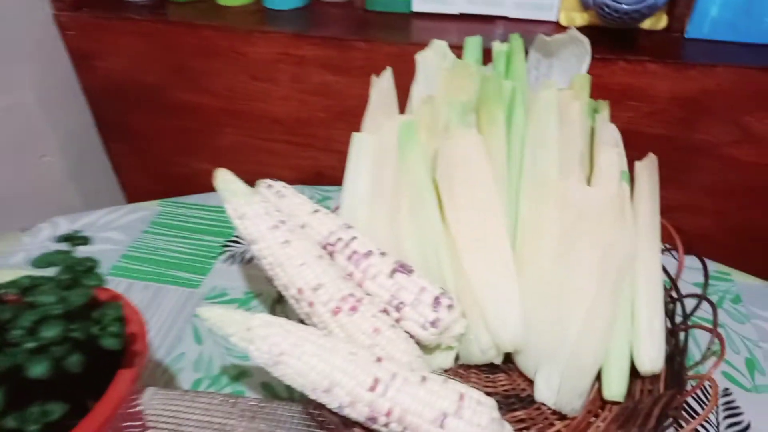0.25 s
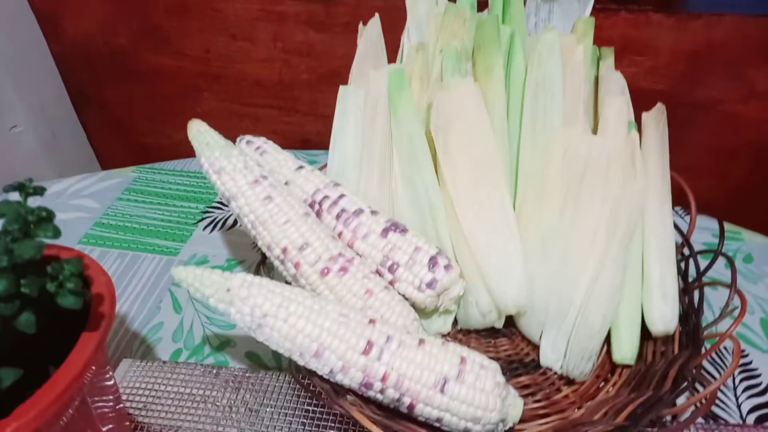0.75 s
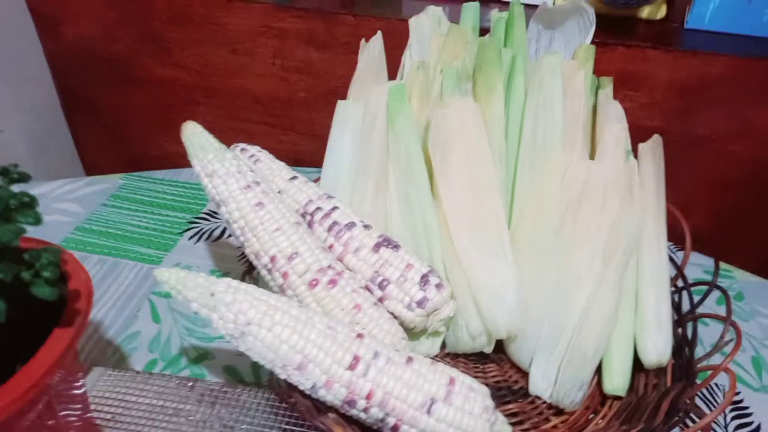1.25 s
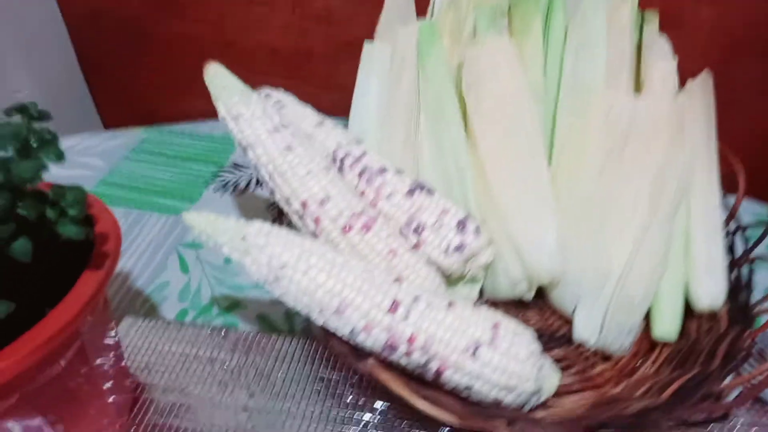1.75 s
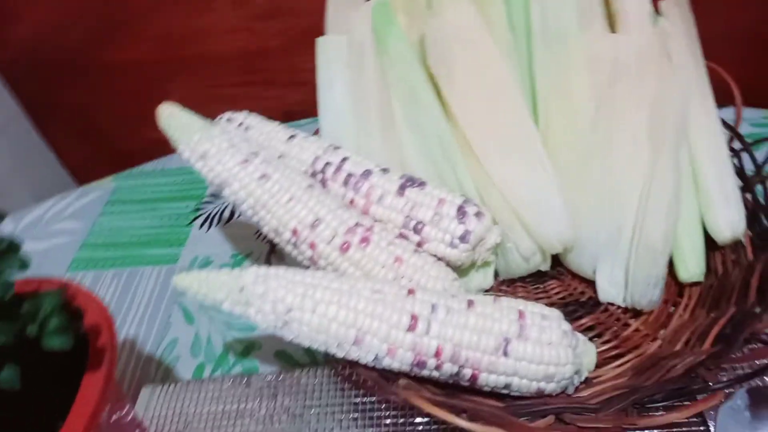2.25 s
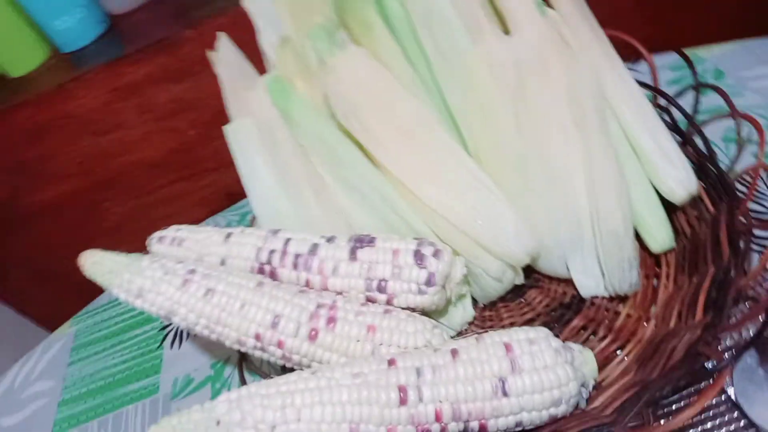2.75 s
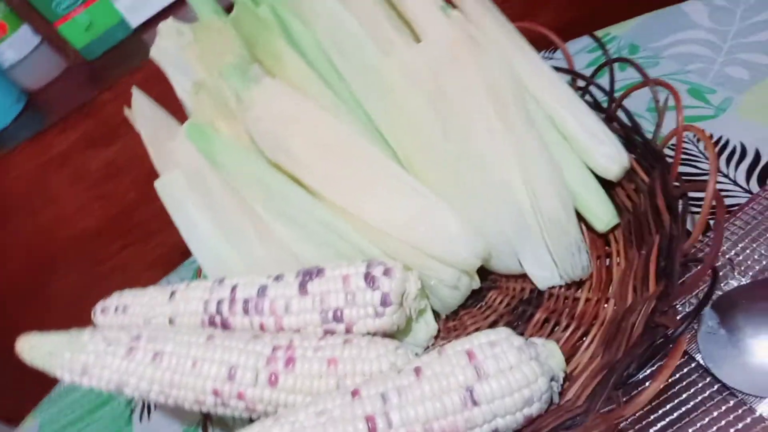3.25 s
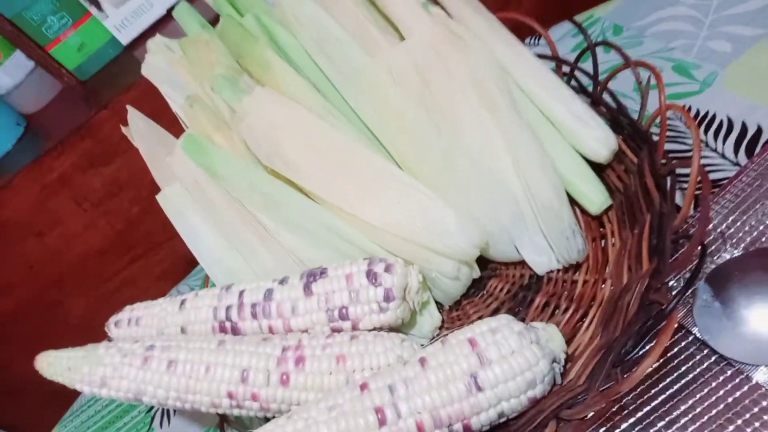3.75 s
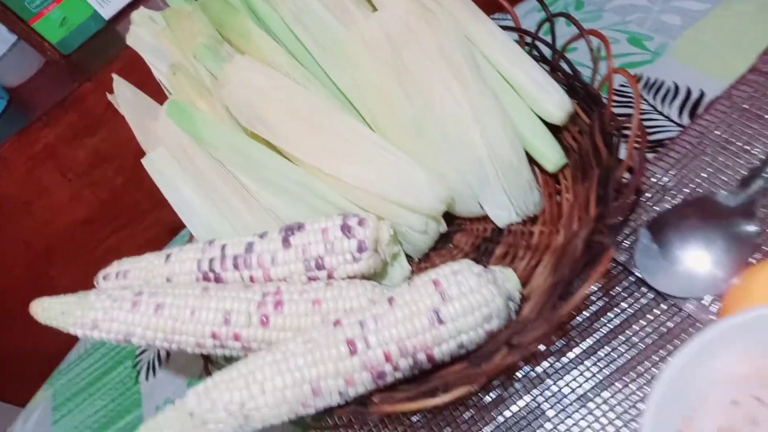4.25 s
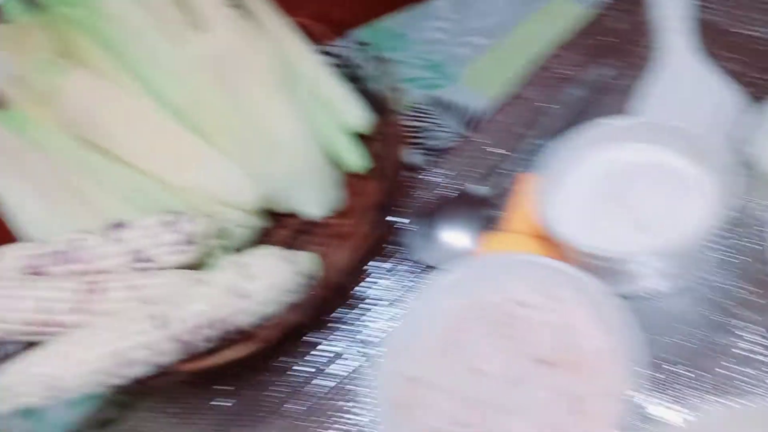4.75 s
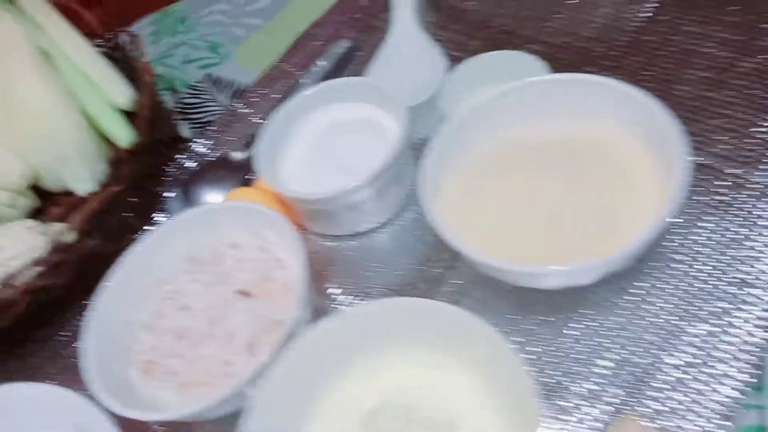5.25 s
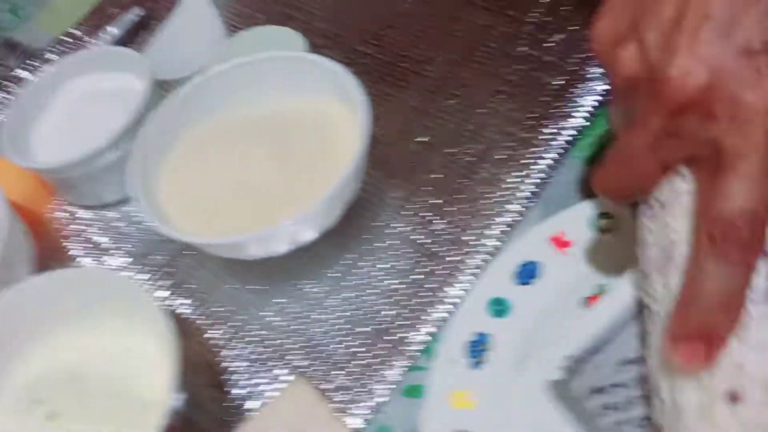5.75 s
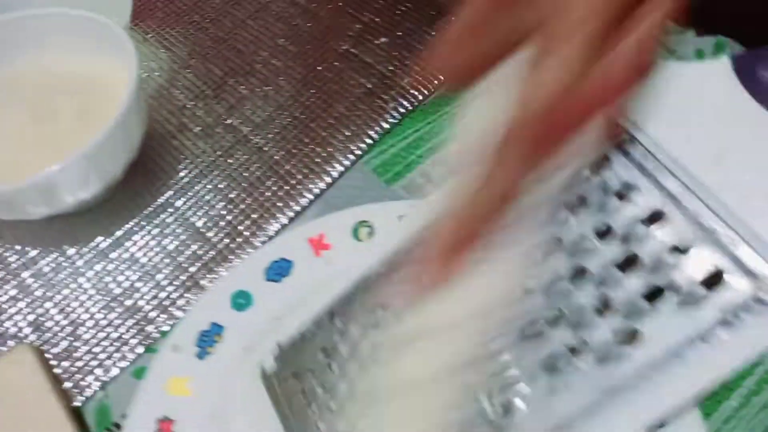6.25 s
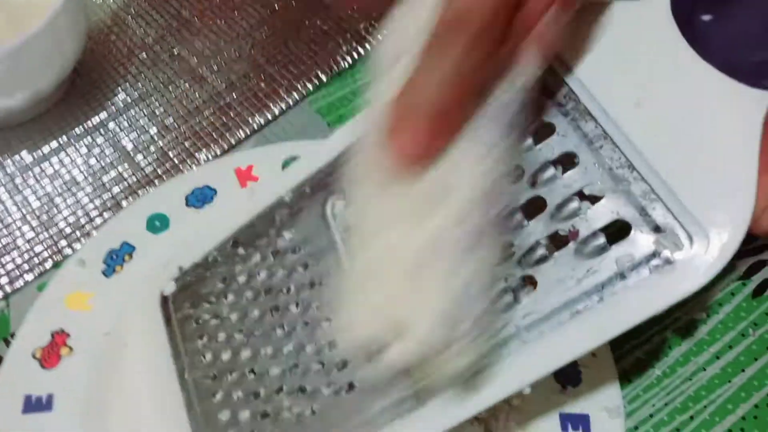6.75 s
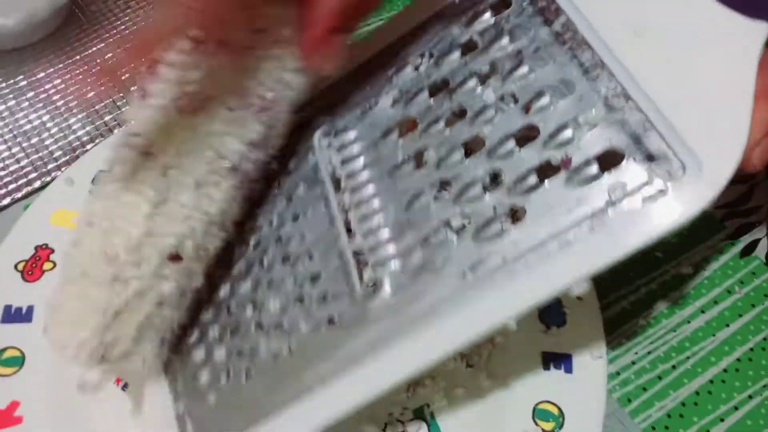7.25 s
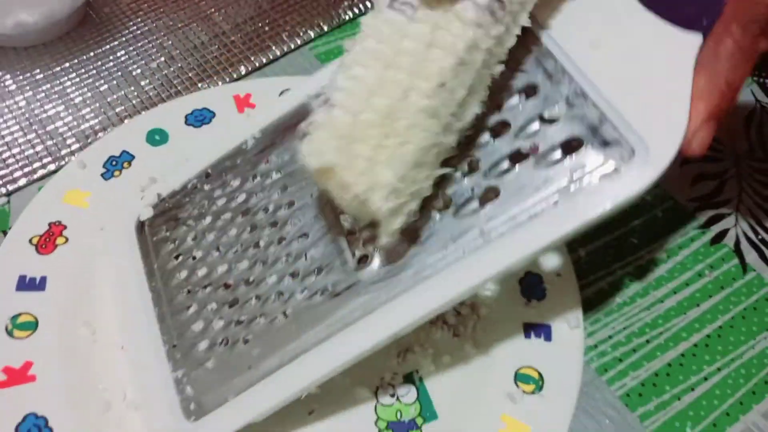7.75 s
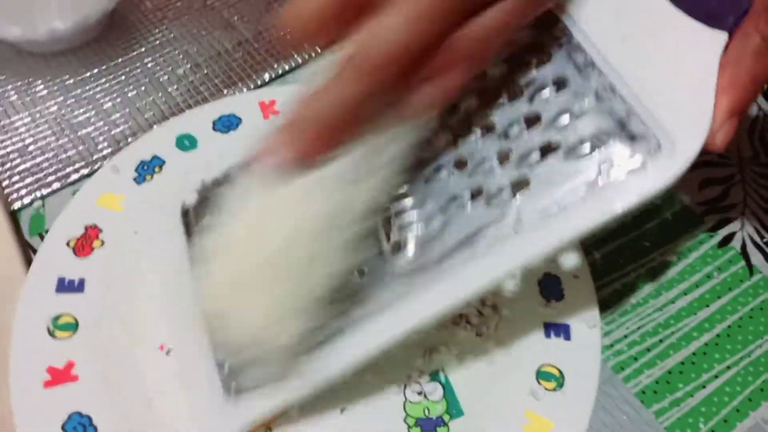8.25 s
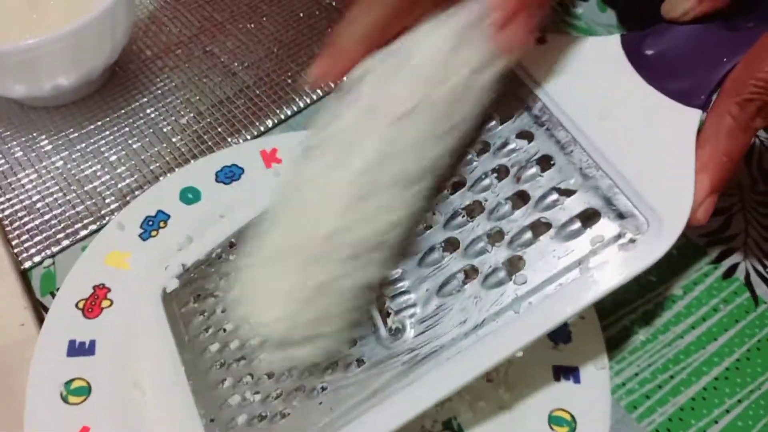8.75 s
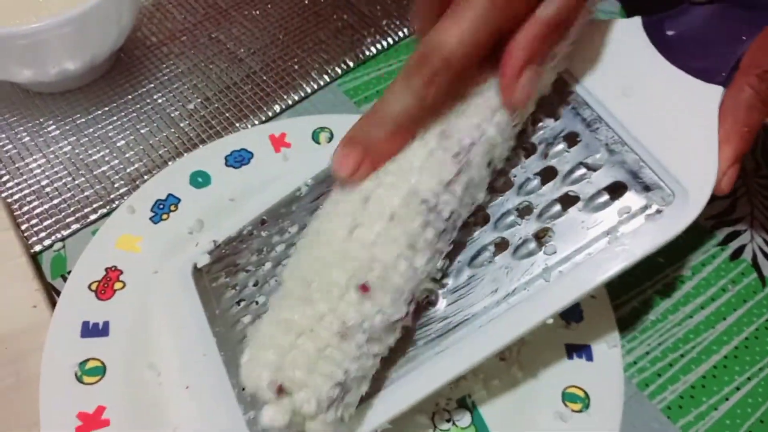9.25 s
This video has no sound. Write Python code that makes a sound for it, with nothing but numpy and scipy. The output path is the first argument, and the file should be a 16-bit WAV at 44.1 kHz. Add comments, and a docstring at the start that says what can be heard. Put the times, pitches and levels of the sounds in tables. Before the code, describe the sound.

In a small, hard-walled kitchen, a fresh corn cob rasps over a flat steel grater. Softer, uneven strokes come first, with a few metallic clacks and a brief lull. A clatter of the frame on a plate follows, then loud, quick, regular back-and-forth scraping with a wet hiss and low table thrum, loosening at the end. Stereo pickup starts a little away and ends close, over faint room noise and hum.

```python
"""Kitchen table in a small hard room: a fresh corn cob is scraped back and forth over a flat steel grater.
The teeth tear wet kernels (hiss, ticks) and pluck the sheet (rasp, note): coloured and resonant grains.
Kernel rows make the table thrum (modes), jolts add low shudders; kernels burst, the frame clacks on a plate.
A soft skid is filtered noise. Echoes, room noise and hum surround it; bearing and treble drift at two ports."""
import sys
import numpy as np
from scipy import signal
from scipy.fft import rfft, irfft
from scipy.io import wavfile
from scipy.ndimage import uniform_filter1d, map_coordinates

SR = 44100
rng = np.random.default_rng(int(sys.argv[2]) if len(sys.argv) > 2 else 0)


def int16_out(signal):
    """Quantize to a 16-bit WAV file."""
    q = np.round(np.clip(np.atleast_2d(signal).T, -1, 1) * 32767)
    wavfile.write(sys.argv[1], SR, q.astype(np.int16))


N = 418068
TIME = np.arange(N) / SR

# strokes of the cob, relative levels: (middle [s], length [s], tearing [dB], plucking above tearing [dB],
# table thrum [dB])
STROKES = [(0.001, 0.49, -49.5, 0, -37.5), (0.442, 0.22, -50.5, -2.5, -43.5), (0.62, 0.37, -51, 3.5, -38),
           (0.847, 0.22, -55, 6, -41.5), (0.998, 0.21, -48.5, 1, -38), (1.052, 0.21, -53, 5, -38),
           (1.215, 0.25, -51.5, 8, -34.5), (1.425, 0.34, -46.5, 0.5, -35.5), (1.627, 0.26, -51.5, 5.5, -37),
           (1.792, 0.31, -49, -0.5, -43), (1.996, 0.24, -52, 1, -46.5), (2.13, 0.19, -47.5, 1, -36.5),
           (2.491, 0.27, -61, 5.5, -48), (2.64, 0.33, -51.5, 2.5, -41), (2.857, 0.31, -52.5, -1.0, -42),
           (2.999, 0.23, -44, 2, -31.5), (3.165, 0.41, -52, 5, -38), (3.304, 0.11, -47.5, -1.5, -38.5),
           (4.387, 0.28, -57, -1, -47.5), (4.547, 0.18, -42.5, 2.0, -30), (4.767, 0.43, -45, 8, -34.5),
           (5.089, 0.14, -50.5, 1.5, -42), (5.225, 0.28, -52, 8, -46), (5.56, 0.21, -41.5, -3.8, -37),
           (5.65, 0.14, -45.5, 1, -38), (5.796, 0.19, -48, 1, -41), (5.937, 0.15, -40.5, 1, -32.5),
           (6.081, 0.19, -39.5, 1, -34.5), (6.238, 0.2, -37, 0, -31.5), (6.387, 0.16, -40, 2.5, -35),
           (6.536, 0.19, -38, 2.0, -32), (6.684, 0.19, -39.5, 2.0, -35), (6.834, 0.2, -38, 1.0, -30.5),
           (6.978, 0.16, -44, 4, -36), (7.123, 0.14, -44, -2.0, -41), (7.26, 0.3, -57.0, -0.5, -63),
           (7.346, 0.23, -51.5, -1.5, -45.5), (7.492, 0.19, -41, 0, -32.5), (7.642, 0.2, -42.0, 0, -33.5),
           (7.79, 0.17, -38.5, -1.5, -31), (7.934, 0.18, -41.0, 2, -30), (8.107, 0.23, -39, -1.5, -34.5),
           (8.25, 0.2, -41.5, 2, -32), (8.409, 0.26, -43, -1, -36), (8.73, 0.34, -50, -5, -45.5),
           (8.863, 0.23, -42.5, -1, -38), (9.019, 0.22, -43.5, -0.5, -38), (9.147, 0.29, -47.5, -3.5, -47)]
# colour of a bursting kernel: (frequency [Hz], relative density [dB])
BURST_COLOUR = [(1000, -22), (3000, -4.5), (6000, -2), (9000, 1.5), (12500, 8), (16000, 1)]


def undb(db):
    """Decibels to gain."""
    return 10 ** (np.asarray(db) / 20)


def unit(x):
    """Scale to rms 1."""
    return x / np.sqrt(np.mean(x ** 2))


def fade(t, t60):
    """Exponential decay, 60 dB down after t60 seconds."""
    return np.exp(-np.log(1000) * t / t60)


def add(track, s, sound):
    """Mix a sound in from time s."""
    i = max(int(s * SR), 0)
    track[i:i + len(sound)] += sound[:N - i]


def colour(x, points):
    """Causal minimum-phase filter with a (Hz, dB) outline, built from the cepstrum."""
    hz, db = np.transpose(points)
    size = 4096
    f = np.maximum(np.fft.rfftfreq(size, 1 / SR), 1)
    log_gain = np.log(undb(np.interp(np.log(f), np.log(hz), db)))
    cepstrum = irfft(log_gain)
    # fold onto positive time
    cepstrum[1:size // 2] *= 2
    cepstrum[size // 2 + 1:] = 0
    impulse = irfft(np.exp(rfft(cepstrum)))
    return signal.fftconvolve(x, impulse)[:len(x)]


def grains(rate, spread_db):
    """Random clicks of uneven size, on average rate per second."""
    hits = rng.random(N) < rate / SR
    sizes = rng.standard_normal(N) * undb(spread_db * rng.standard_normal(N))
    return unit(hits * sizes)


def resonance(x, hz, width):
    """Resonance of given width [Hz] whose centre may slide from sample to sample."""
    turn = np.exp(2j * np.pi * np.cumsum(hz) / SR)
    low = signal.butter(2, width / 2, fs=SR, output="sos")
    return unit(np.real(turn * signal.sosfilt(low, x / turn)))


def snap(points, t60):
    """Brief coloured crackle of unit energy; a flat spectrum before colouring keeps it even."""
    t = np.arange(SR // 10) / SR
    spectrum = rfft(rng.choice([-1, 1], len(t)) * fade(t, t60))
    flat = irfft(spectrum / (np.abs(spectrum) + 1e-9), len(t))
    x = colour(flat * fade(t, 10 * t60), points)
    return x / np.linalg.norm(x)


def kitchen(noise_db=-55.5, apart_hz=700, hum_hz=60, hum_db=-57.5):
    """Quiet room noise, alike at both ports in the bass only, and a faint mains hum."""
    # colour of the room noise: (frequency [Hz], relative density [dB])
    noise_colour = [(25, -17), (45, -13), (62, 9.5), (100, -5), (170, -7), (240, 0), (380, -16.5),
                    (850, -9.5), (2100, -13), (3000, -21.5), (6500, -23.5), (8000, -19.5), (12000, -22.5),
                    (16000, -27)]
    mid, side = (unit(colour(rng.standard_normal(N), noise_colour)) for _ in range(2))
    side = signal.sosfilt(signal.butter(1, apart_hz, "high", fs=SR, output="sos"), side)
    hum = undb(hum_db) * unit(np.sin(2 * np.pi * hum_hz * TIME))
    return undb(noise_db) * np.array([mid + side, mid - side]) + hum


def sweep(middle, length):
    """One stroke: its start [s], the cob's travel from -.5 to .5, and its speed, which swells and dies."""
    start = max(middle - length / 2, 0)
    travel = (np.arange(start, middle + length / 2, 1 / SR) - middle) / length
    return start, travel, np.abs(np.cos(np.pi * travel))


def linger(power, near_db, far_db, t60):
    """Power that returns at once from bowls and table, and slowly from the walls."""
    keep = fade(1 / SR, t60)
    slow = signal.lfilter([1 - keep], [1, -keep], power)
    return undb(near_db) ** 2 * power + undb(far_db) ** 2 * slow


def stroke_energy(arch=3.42, slide=0.065, rows_db=2.5, middling_hz=1670, middling_db=-43.5, hz_per_db=11):
    """The cob speeds up and stops in each stroke: power of tearing, power of plucking, note of the sheet."""
    tear, bite, note_hz = np.zeros(N), np.zeros(N), np.full(N, middling_hz, float)
    for middle, length, db, bite_db, _ in STROKES:
        start, travel, speed = sweep(middle, length)
        add(bite, start, (speed ** arch * undb(db + bite_db)) ** 2)
        add(tear, start, (speed ** arch * undb(db)) ** 2)
        # harder strokes sound higher
        stroke_hz = middling_hz + hz_per_db * (db - middling_db)
        # the cob loads the sheet more as it digs in, so the note sinks through the stroke
        note_hz[int(start * SR):][:len(travel)] = stroke_hz * np.exp(-slide * travel)
    # each row of kernels meets the teeth with its own resistance
    rows = undb(rows_db * unit(uniform_filter1d(rng.standard_normal(N), size=300))) ** 2
    rows = rows / rows.mean()
    return tear * rows, bite * rows, note_hz


def scraping(tear, bite, note_hz, hiss_db=-1, spatter_db=-9, rasp_db=-3, note_db=-4):
    """Wet kernels tear in a fine hiss with coarser ticks; the teeth pluck the sheet, which the cob damps."""
    # colours of tearing and plucking: (frequency [Hz], relative density [dB])
    hiss_colour = [(1500, -10.5), (3000, 1.5), (4500, -0.5), (6300, -2.5), (7700, 2.5), (8800, 1),
                   (10300, 1.5), (12000, 3.5), (16000, -2.5)]
    rasp_colour = [(150, -2.5), (300, 2.5), (550, -0.5), (900, 2), (1200, -6), (1600, -3.5), (2300, -6),
                   (2700, -4), (3300, -12.5), (6000, -17.5)]
    hiss = undb(hiss_db) * unit(colour(grains(rate=14000, spread_db=5.0), hiss_colour))
    spatter = undb(spatter_db) * unit(colour(grains(rate=110, spread_db=1.5), BURST_COLOUR))
    rasp = undb(rasp_db) * unit(colour(grains(rate=2200, spread_db=0.0), rasp_colour))
    note = undb(note_db) * resonance(grains(rate=1500, spread_db=2.0), note_hz, width=1040)
    return (hiss + spatter) * np.sqrt(tear) + (rasp + note) * np.sqrt(bite)


def pressure(arch=4.24, lag_s=0.015, overhang_s=0.025):
    """Each stroke bears down on the table, which goes on trembling for a moment: strength of the thrum."""
    power = np.zeros(N)
    for middle, length, _, _, db in STROKES:
        # the hand's weight comes a little after the cob starts to move, and stays a little longer
        start, _, speed = sweep(middle + lag_s, length + overhang_s)
        add(power, start, (speed ** arch * undb(db)) ** 2)
    return np.sqrt(linger(power, near_db=4.5, far_db=4.5, t60=0.18))


def table_ring():
    """Low, well damped answer of the table to one push: decaying modes of alternating sign."""
    # modes of table top and plate: (frequency [Hz], width [Hz], relative level [dB])
    table_modes = [(63, 28, -12.5), (106.7, 23.4, 0.5), (124.05, 19.1, 5), (163.4, 40, -7.5),
                   (210.4, 15.6, -6), (290.9, 38, -7.5), (381.8, 9.4, -15), (436.6, 22, -15.5),
                   (574.4, 33, -20.5), (702, 52, -27.5)]
    t = np.arange(SR // 3) / SR
    ring = np.zeros(len(t))
    for k, (hz, width, db) in enumerate(table_modes):
        decay = width * np.exp(-np.pi * width * t)
        ring += (-1) ** k * undb(db) * decay * np.sin(2 * np.pi * hz * t)
    return ring


def thrum(thrum_db=1.0, jolt_db=2.5, jolt_hz=120, rattle_db=-14, lumps_db=1.0, after_db=-9, after_t60=0.26):
    """Rows of kernels bump over the teeth and shake the table; a catch makes it shudder for a few cycles."""
    # the cob catches and the table shudders: (middle [s], relative level [dB], length [s])
    jolts = [(0.133, -27, 0.063), (1.033, -22.5, 0.05), (1.105, -26.5, 0.049), (1.491, -14, 0.042),
             (1.63, -23, 0.038), (1.812, -24.5, 0.059), (2.013, -25, 0.049), (2.704, -26.5, 0.067),
             (2.869, -23, 0.047), (3.223, -19.5, 0.045), (3.305, -24, 0.058), (4.59, -16.5, 0.08),
             (4.891, -24.5, 0.061), (5.19, -21.5, 0.057), (6.578, -18, 0.043), (6.882, -18.5, 0.059),
             (7.965, -19, 0.04), (8.398, -23, 0.043), (8.467, -24, 0.043)]
    shake = signal.fftconvolve(grains(rate=510, spread_db=0), table_ring())[:N]
    # the hand holds the force nearly even from one row to the next
    shake = shake / np.sqrt(uniform_filter1d(shake ** 2, size=1800) + 1e-9)
    lumps = undb(lumps_db * unit(uniform_filter1d(rng.standard_normal(N), size=1300)))
    shudder, catch = np.zeros(N), np.zeros(N)
    t = np.arange(SR // 3) / SR
    for s, db, length in jolts:
        # the shudder swells and drops, and a weaker part rings on
        swell = np.sin(np.pi * np.minimum(t / length, 1)) ** 2
        after = undb(after_db) * fade(t - length / 2, after_t60) * (t > length / 2)
        tone = np.sin(2 * np.pi * jolt_hz * t)
        add(catch, s - length / 2, undb(db) * swell)
        add(shudder, s - length / 2, undb(db) * np.maximum(swell, after) * tone)
    # a catch also stirs the table's higher modes
    upper = signal.sosfilt(signal.butter(3, [190, 480], "band", fs=SR, output="sos"), shake)
    rattle = undb(rattle_db) * catch * unit(upper)
    return undb(thrum_db) * shake * lumps * pressure() + undb(jolt_db) * shudder + rattle


def bursts(burst_db=11):
    """A kernel's skin gives way with a wet tick, a coloured crackle."""
    # single kernels burst: (time [s], relative level [dB])
    burst_events = [(0.405, -30), (1.479, -24), (3.2007, -25), (5.5764, -16.5), (5.8197, -20),
                    (6.4355, -20), (6.993, -14.5), (7.5037, -16.5), (7.661, -17.5), (7.788, -16),
                    (8.127, -22), (8.264, -20)]
    out = np.zeros(N)
    for s, db in burst_events:
        add(out, s, undb(db + burst_db) * snap(BURST_COLOUR, t60=.016))
    return out


def grater_ring():
    """Modes of the grater; each point of contact weights and detunes them a little."""
    # ring of grater and plate: (frequency [Hz], relative level [dB], t60 [s])
    grater_modes = [(780, -17, 0.19), (1190, 0.5, 0.11), (1636, 8.5, 0.22), (1713, 4, 0.074),
                    (1900, -15, 0.54), (1890, -13, 0.34), (2144, 15, 0.057), (2330, 12, 0.1),
                    (2420, 2, 0.16), (2750, 10, 0.14), (2900, -4, .08), (3800, -4, .07), (4460, -22, 0.057),
                    (8250, 2, 0.036)]
    t = np.arange(SR // 3) / SR
    ring = 0
    for hz, db, t60 in grater_modes:
        weight = undb(db + 2 * rng.standard_normal())
        detune = 1 + .004 * rng.standard_normal()
        ring = ring + weight * fade(t, t60) * np.sin(2 * np.pi * (hz * detune * t + rng.random()))
    return ring / np.linalg.norm(ring)


def clacks(knock_db=8, crack_db=11, ring_db=1, clatter_db=7, clatter_t60=0.0062, knock_t60=0.0054,
           crack_t60=0.00092):
    """Frame against plate: a sharp crack, a hollow knock and the ring of the steel."""
    # the grater knocks on the plate: (time [s], relative level [dB], crack brightness [dB])
    clack_events = [(0.4382, -15.5, -11), (0.8255, -26.5, -28), (0.8605, -18.5, -6.5), (1.1802, -20, -27),
                    (2.2238, -35, -22), (2.6175, -6.5, -15.5), (2.8894, -14.5, -29), (3.0041, -7, -3),
                    (3.1093, -16, -31), (3.3488, -12, -16), (4.5138, -25, -17), (4.616, -18.5, -21),
                    (4.7153, -14.5, -19), (4.7345, -2, -9.5), (4.7547, -4.5, -12.5), (4.7695, -7.5, -3),
                    (4.7809, -9.5, -16), (4.8441, -10.5, -10.5), (5.0986, -25.5, -17), (5.1147, -22.5, -27),
                    (5.1648, -11, -7), (5.1721, -9, -28), (5.2054, -12.5, -32), (5.5436, -5, -7),
                    (5.9151, -5.5, -15), (6.1, -20.5, -10), (6.2467, -13.5, -8), (6.6383, -21, -14),
                    (7.466, -24, -15)]
    # colours of knock and crack: (frequency [Hz], relative density [dB])
    knock_colour = [(100, -23), (280, -12), (480, 7.5), (700, -1.5), (1050, -11), (1750, 6), (2450, 3),
                    (3200, -3), (4400, -8), (6500, -21), (16000, -111)]
    crack_colour = [(2000, -30), (4200, 6), (5500, 2.5), (6600, -1), (7900, 1), (9300, -11), (12000, 1),
                    (16000, -15)]
    out = np.zeros(N)
    for s, db, bright_db in clack_events:
        add(out, s, undb(db + knock_db) * snap(knock_colour, knock_t60))
        add(out, s, undb(db + crack_db + bright_db) * snap(crack_colour, crack_t60))
        # contact with the plate chokes most of the ring at once; a faint part sings on
        ring = grater_ring()
        choked = ring * fade(np.arange(len(ring)) / SR, clatter_t60)
        clatter = undb(db + clatter_db) * choked / np.linalg.norm(choked)
        add(out, s, clatter + undb(db + ring_db) * ring)
    return out


def skid(width=480):
    """The cob skids softly as it is set down again: a dull scuff that falls in pitch as the cob slows."""
    # course of the skid: (time [s], level [dB], centre [Hz])
    skid_course = [(2.40, -75, 1400), (2.425, -52, 950), (2.45, -51, 500), (2.49, -46, 317),
                   (2.56, -70, 250)]
    s, db, hz = np.transpose(skid_course)
    gain = np.interp(TIME, s, undb(db), left=0, right=0)
    return gain * resonance(rng.standard_normal(N), np.interp(TIME, s, hz), width)


def room_tail(early_db=5, early_t60=0.039):
    """Echoes at one port: a quick cluster off bowls and table, then the walls, each band with its own decay."""
    # reverberation bands: (centre [Hz], wall t60 [s], echo energy relative to the direct sound [dB])
    room_bands = [(131, 0.77, -35), (398, 0.24, -6.5), (920, 0.23, 5.5), (2080, 0.35, 0),
                  (4670, 0.28, -0.5), (9700, 0.15, 0), (15800, 0.78, -5)]
    t = np.arange(20480) / SR
    hz, t60, db = np.transpose(room_bands)
    log_f = np.log(np.maximum(np.fft.rfftfreq(len(t), 1 / SR), 1))
    noise, tail = rfft(rng.standard_normal(len(t))), 0
    early = undb(early_db) * fade(t, early_t60)
    for k, share in enumerate(np.eye(len(hz))):
        shape = fade(t, t60[k]) + early
        band = irfft(noise * np.interp(log_f, np.log(hz), share))
        tail = tail + band * undb(db[k]) * shape / np.linalg.norm(shape)
    return tail


def room(x, size=16384):
    """Hand and ports keep moving, so the pattern of echoes changes from one overlapping block to the next."""
    out = np.zeros(N)
    padded = np.pad(x, size)
    for i in range(0, N + size, size):
        piece = padded[i:i + 2 * size]
        window = signal.windows.cosine(2 * size)[:len(piece)]
        wet = signal.fftconvolve(piece * window, room_tail())
        add(out, (i - size) / SR, wet[max(size - i, 0):])
    return out


def scene(table_pan_db=0.5, direct_db=1.5, top_hz=10000):
    """Direct sound reaches the two ports at different times; the room answers from all sides."""
    # bearing of the grater: (time [s], left minus right [dB], delay of the left port [ms], treble [dB])
    bearing = [(0, -2.5, 0.22, -0.5), (2, -1, 0.29, 0), (2.7, -2.5, 0.48, -5.5), (4.8, -3.5, 0.5, -3.5),
               (5.5, -3, 0.074, -6.5), (6, -1, -0.067, -5), (6.6, -0.5, -0.135, -4), (8.2, 0.5, -0.12, -2),
               (9.4, -1.5, -0.14, -1.5)]
    s, *columns = np.transpose(bearing)
    pan_db, lag_ms, top_db = (np.interp(TIME, s, c) for c in columns)
    sides = np.array([[1], [-1]]) / 2
    tear, bite, note_hz = stroke_energy()
    # the table's thrum spreads from a little further left than the steel
    body = clacks() + bursts() + skid() + undb(sides * table_pan_db) * thrum()
    near = body + undb(direct_db) * scraping(tear, bite, note_hz)
    places = (TIME - sides * lag_ms / 1000) * SR
    direct = np.array([map_coordinates(x, [at], order=3) for x, at in zip(near, places)])
    # hundreds of teeth each have their own echo paths: scattered scraping is unrelated at the two ports
    scattered_tear = linger(tear, near_db=4.5, far_db=-0.5, t60=0.25)
    scattered_bite = linger(bite, near_db=2, far_db=2.5, t60=0.14)
    echoes = np.array([room(x) + scraping(scattered_tear, scattered_bite, note_hz) for x in body])
    heard = (direct + echoes) * undb(sides * pan_db)
    # the ports catch more of the treble when they face the grater
    top = signal.sosfiltfilt(signal.butter(2, top_hz, "high", fs=SR, output="sos"), heard)
    return heard + (undb(top_db) - 1) * top + kitchen()


def record(dry, bass_hz=48, top_hz=16100):
    """Drop the deep bass, clip at full scale and cut the top steeply."""
    thin = signal.sosfilt(signal.butter(5, bass_hz, "high", fs=SR, output="sos"), dry)
    low_pass = signal.ellip(10, .2, 70, top_hz, fs=SR, output="sos")
    return signal.sosfilt(low_pass, np.clip(thin, -1, 1))


dry = scene()
out = record(dry)
int16_out(out)
```